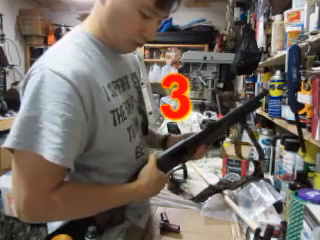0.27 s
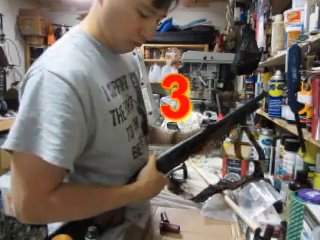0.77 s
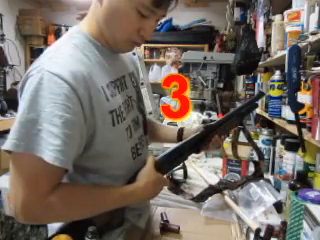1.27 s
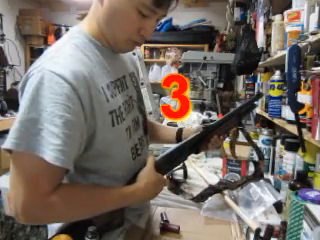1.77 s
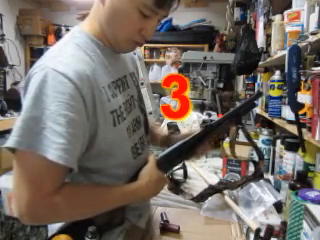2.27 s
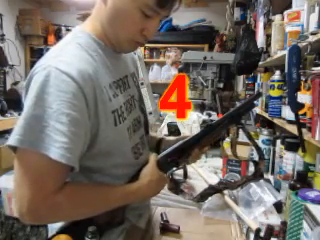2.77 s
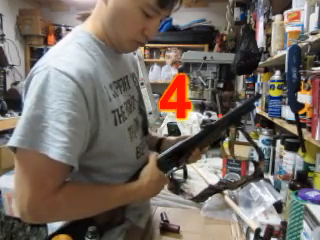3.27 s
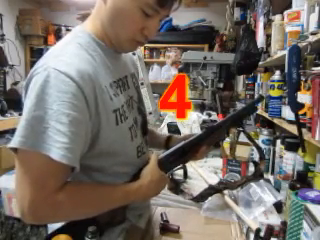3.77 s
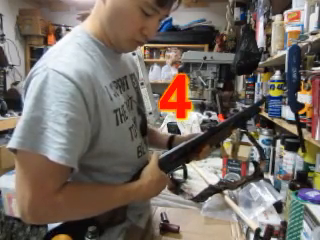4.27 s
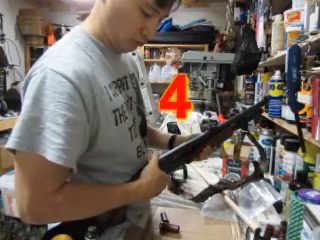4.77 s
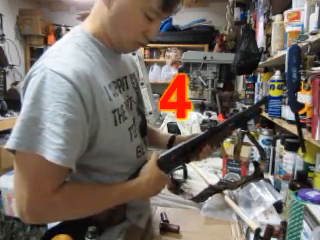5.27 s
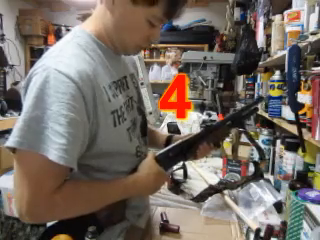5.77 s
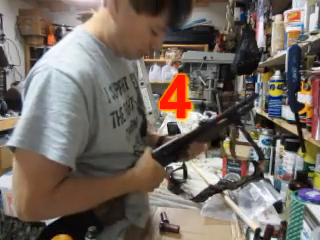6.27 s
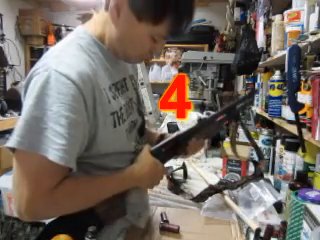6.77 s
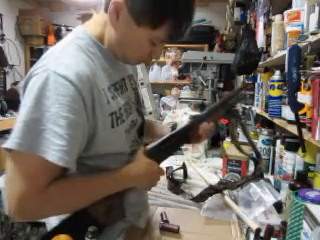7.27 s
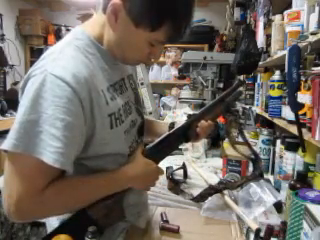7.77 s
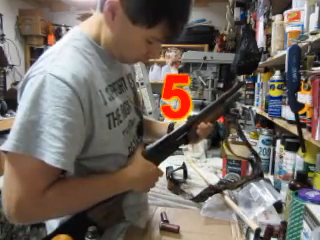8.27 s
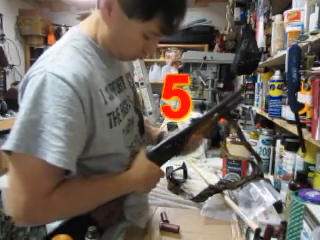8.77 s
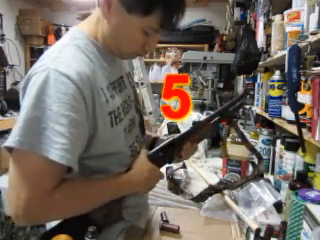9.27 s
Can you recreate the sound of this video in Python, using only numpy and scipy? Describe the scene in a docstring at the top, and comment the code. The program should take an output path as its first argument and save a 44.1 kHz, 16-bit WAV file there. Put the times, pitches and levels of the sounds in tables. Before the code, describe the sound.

Shells clack against a steel loading gate, scrape into the tube and seat with a low rumbling thump. The gate spring rings briefly after several clicks. Palms bump the stock and loose parts rattle lightly in the gaps. The gun is very near the microphone, slightly right, with a long, diffuse, dull room tail and little high treble.

```python
"""Loading a shotgun in a workshop

Shells are thumbed one by one into the magazine tube, in a cluttered workshop with a long dark reverberation.
Each clacks against the gate (filtered impulses and noise), scrapes in (trains of tiny clacks) and seats with
a thud (damped low modes) and a deep rumble (swelling noise). Hands bump the stock, loose parts rattle, the
gate spring sings, shells tap together and one creaks. Everything sounds deep and dull."""
import sys
import numpy as np
from scipy import signal
from scipy.fft import rfft, irfft, next_fast_len
from scipy.io import wavfile
from scipy.ndimage import uniform_filter1d, minimum_filter1d

SR = 44100
rng = np.random.default_rng(int(sys.argv[2]) if len(sys.argv) > 2 else 0)


def unload_wav(signal):
    """Save mono or channel-first audio to the path in sys.argv[1] as 16-bit WAV at rate SR, clipped to [-1, 1]."""
    wavfile.write(
        sys.argv[1],
        SR,
        np.round(np.clip(np.atleast_2d(signal).T, -1, 1) * 32767).astype(np.int16),
    )


N = 419832

TOP_HZ = 10800  # upper band limit
LEAD_IN = .012  # graze ahead of a blow (s)

# A hand or the gun's own weight bumps the stock. Each row: start in seconds, level in dB,
# then relative to it in dB: knock, rattle of loose parts, rocking of the gun.
STOCK_BUMPS = [(0.004, -27.5, -4.5, -17.5, 13.5), (0.653, -10.5, -6, -30.5, 3),
               (0.697, -19.5, -17, -27.5, -1), (0.81, -34, -2.5, -21, -1.5), (0.918, -16, -5.5, -16, 5),
               (1.1, -17.5, -12, -5.5, 0), (1.605, -22, -10, -2, 1), (1.724, -30.5, 3.5, -4, 4.5),
               (1.805, -38, -2, 8, 12), (2.302, -38, -1.5, -15, 15.5), (2.88, -39.5, -10.5, -15, 20.5),
               (3.373, -23, 8.5, 4.5, 12), (3.398, -19.5, 11.5, -6.5, 11.5), (3.83, -39, -7.5, -15, 17),
               (4.276, -15, -9, -14, 6.5), (4.319, -26, 0, -3, 15.5), (4.414, -19.5, -9.5, -20, 2),
               (4.548, -18, -12, -22, -1), (4.717, -33, -16, -14, 19.5), (4.788, -11.5, -11, -30.5, 0),
               (5.026, -14.5, -13.5, -35, 3), (5.156, -19, -21, -44, 3.5), (5.23, -33.5, -17, -24, 7),
               (5.321, -31, -15.5, -21.5, 8), (5.447, -39, -19.5, -12, 16.5),
               (5.822, -27.5, 5.5, -1.5, 9.5), (5.845, -25.5, -1.5, -14, 3), (5.984, -35, -14, -13.5, 8),
               (6.055, -31.5, -0.5, -19, 7.5), (6.487, -26, -5, -9, -12.5), (6.568, -27.5, 6, -0.5, -14),
               (7.323, -22, 1, -3.5, -7.5), (8.79, -33.5, -7, -13.5, 10), (9.157, -29.5, 1, -15.5, 14)]
# A shell goes home, shoving the gun against the body. Each row: time in seconds, rumble level in dB,
# level of the seating thud in dB.
SEATINGS = [(1.134, -22.5, -30.5), (2.78, -27, -31.5), (7.458, -27.5, -29.5), (9.249, -38.5, -35.5)]


def amp(db):
    """Decibels to amplitude."""
    return 10 ** (np.asarray(db) / 20)


def unit(x):
    """Scale to rms 1."""
    return x / np.sqrt(np.mean(x ** 2) + 1e-20)


def attack_unit(x, seconds):
    """Scale a blow to rms 1 over its first moments."""
    return x / np.sqrt(np.mean(x[..., :int(seconds * SR)] ** 2) + 1e-20)


def along(points, hz):
    """Read a curve of (Hz, value) points on a log frequency axis."""
    f, v = np.transpose(points)
    return np.interp(np.log(hz + 1), np.log(f), v)


def add(track, s, sound):
    """Mix a sound in from time s."""
    start = int(np.clip(round(s * SR), 0, N - 1))
    track[:, start:start + sound.shape[-1]] += sound[..., :N - start]


def pair(x, left_db):
    """Make the left channel louder than the right by left_db."""
    return x * amp([[left_db / 2], [-left_db / 2]])


def coloured(x, gain_db):
    """Causal minimum-phase filter whose gain in dB is a function of frequency."""
    n = x.shape[-1]
    m = 2 * next_fast_len(n // 2 + SR // 10)
    cepstrum = irfft(gain_db(np.fft.rfftfreq(m, 1 / SR)) * np.log(10) / 20)
    # folding the cepstrum forward makes the filter causal
    cepstrum[1:m // 2] *= 2
    cepstrum[m // 2 + 1:] = 0
    return irfft(rfft(x, m) * np.exp(rfft(cepstrum)), m)[..., :n]


def ring(modes, t, vary_db, detune, together=False):
    """Damped modes, varied at each blow by grip and point of contact; a square blow starts them together."""
    hz, db, t60 = np.transpose(modes)[:, :, None]
    size, shift = rng.standard_normal((2, len(modes), 1))
    sign = np.where(together, 1, rng.choice([-1, 1], (len(modes), 1)))
    decay = amp(db + vary_db * size - 60 * t / t60)
    tone = np.sin(2 * np.pi * hz * (1 + detune * shift) * t)
    return np.sum(sign * decay * tone, 0)


def air(level_db=-66):
    """Faint low room tone: filtered noise, partly shared by the two channels."""
    # Spectrum of the room tone. Each row: frequency in Hz, density in dB per Hz.
    tone_colour = [(25, 0), (70, 2), (160, -13.5), (300, -13), (1500, -26.5), (3000, -41), (5000, -59)]
    noise = rng.standard_normal((3, N))
    return amp(level_db) * unit(coloured(noise[:2] + noise[2], lambda hz: along(tone_colour, hz)))


def room_tail(build=0.013, linger=2.93):
    """A diffuse stereo tail builds up, then the treble dies first while a faint late part lingers."""
    # Decay of the workshop. Each row: frequency in Hz, t60 in seconds.
    decay_times = [(60, 1.5), (200, 1.11), (500, 1.013), (1400, 0.93), (2000, 0.92), (3000, 0.7),
                   (4200, 0.66), (8000, .33)]
    # Level of the lingering late part. Each row: frequency in Hz, level in dB.
    late_level = [(2500, -15.5), (3400, -17.5), (4300, -42)]
    # Likeness of left and right. Each row: frequency in Hz, correlation from 0 to 1.
    likeness = [(60, 1), (150, 0.53), (350, 0.64), (700, 0.29), (4000, 0.045)]
    hz, t, z = signal.stft(rng.standard_normal((2, 3 * SR // 2)), SR, nperseg=512)
    fall_db = -60 * t / along(decay_times, hz)[:, None]
    late_db = along(late_level, hz)[:, None] + fall_db / linger
    z = z * np.hypot(amp(fall_db), amp(late_db)) * (1 - np.exp(-t / build))
    # sharing the power between mid and side sets the likeness
    turn = np.arccos(np.clip(along(likeness, hz), -1, 1))[:, None] / 2
    mid, side = signal.istft(z * np.array([np.cos(turn), np.sin(turn)]), SR, nperseg=512)[1]
    return np.array([mid + side, mid - side]) / np.sqrt(SR / 10)


def room(x):
    """Overlapping pieces each get a fresh tail: the reflections change as the gun and the body move."""
    out, mono, hop = np.zeros((2, N)), x.mean(0), SR // 3
    for start in range(-hop, N, hop):
        index = np.arange(max(start, 0), min(start + 2 * hop, N))
        piece = mono[index] * np.sin(np.pi * (index - start) / (2 * hop))
        add(out, index[0] / SR, signal.fftconvolve(piece[None], room_tail(), axes=1))
    return out


def shove(swell=0.024, strain_db=-18, strain=0.2, sway_db=5):
    """A deep noise rumble strains up, peaks as each shell goes home and eases off again."""
    # Spectrum of the rumble. Each row: frequency in Hz, density in dB per Hz.
    rumble_colour = [(15, -23), (28, -8.5), (44, -5), (62, -10), (100, -16.5), (190, -9.5), (400, -52),
                     (1200, -100)]
    # Spectrum of the deepest part, opposite in the two channels. Each row: frequency in Hz, dB per Hz.
    sway_colour = [(15, -18), (30, -3), (65, 0), (110, -8), (200, -24), (500, -70)]
    t = np.arange(N) / SR
    push = np.zeros(N)
    for s, db, _ in SEATINGS:
        away = np.abs(t - s)
        push += amp(db) * (np.exp(-away / swell) + amp(strain_db) * np.exp(-away / strain))
    rumble = unit(coloured(rng.standard_normal((2, N)), lambda hz: along(rumble_colour, hz)))
    sway = amp(sway_db) * unit(coloured(rng.standard_normal(N), lambda hz: along(sway_colour, hz)))
    return pair(push * (rumble + np.array([sway, -sway])), left_db=-3.5)


def thud(modes, t, detune, vary_db=2, together=False):
    """Wood and mass answer a blow as damped modes, heard nearly alike in both channels."""
    body_s, width = .06, .18  # stretch that sets the level (s), left-right difference (share)
    mid = attack_unit(ring(modes, t, vary_db, detune, together), body_s)
    side = width * attack_unit(ring(modes, t, vary_db=3.5, detune=0.12), body_s)
    return np.array([mid + side, mid - side])


def bumps(stock_db=-12, boom_db=-25, knock_db=-17, slap_db=-14, slap_t60=0.09, soft=0.0083,
          knock_rise=.001, slap_rise=0.0013):
    """Palm, fingers and seating shells thump the stock, knock the fore-end and rock the gun."""
    # Modes of the stock. Each row: frequency in Hz, level in dB, t60 in seconds.
    stock_modes = [(98, -14, 0.57), (140.4, -2, 0.35), (188.5, -14, 0.54), (226.3, -9, 0.2)]
    # Modes of the fore-end. Each row: frequency in Hz, level in dB, t60 in seconds.
    fore_end_modes = [(214, 2, .09), (320, 3, 0.11), (423, -1.5, 0.096), (460, 3.5, 0.054),
                      (620, -5.5, .039)]
    # The whole gun rocking. Each row: frequency in Hz, level in dB, t60 in seconds.
    rocking_modes = [(28.2, -2.5, 0.022), (42.7, -7.5, 0.48), (67, -9, 0.49)]
    # Spectrum of a soft slap of skin. Each row: frequency in Hz, density in dB per Hz.
    skin_colour = [(30, -4), (120, -3), (350, 0), (700, -8), (1200, -26), (3000, -34), (4200, -45),
                   (5200, -81.5)]
    # Phase by which thumps lag in the left channel. Each row: frequency in Hz, lag in radians.
    left_lag = [(50, 0), (120, .6), (600, .7)]
    seat_knock_db, seat_rock_db = 6.5, 9.5  # knock and rocking of a seating shell, over its thud
    sag, sag_s = 0.29, .035  # excess pitch at the start (share), settling time (s)

    out, t = np.zeros((2, N)), np.arange(SR // 2) / SR
    # the stock's note starts sharp under the palm and sinks
    sagging = t + sag * sag_s * (1 - np.exp(-t / sag_s))
    seats = [(s, db, seat_knock_db, None, seat_rock_db) for s, _, db in SEATINGS]
    for s, db, knock, _, rock_db in STOCK_BUMPS + seats:
        stock = amp(stock_db) * thud(stock_modes, sagging, detune=.02)
        fore_end = amp(knock + knock_db) * thud(fore_end_modes, t, detune=.06, together=True)
        fore_end = fore_end * (1 - np.exp(-t / knock_rise))
        rock = amp(boom_db + rock_db) * thud(rocking_modes, t, detune=.04)
        flesh = rng.standard_normal(len(t)) * amp(-60 * t / slap_t60) * (1 - np.exp(-t / slap_rise))
        slap = attack_unit(coloured(flesh, lambda hz: along(skin_colour, hz)), 0.012)
        cushioned = (stock + rock) * (1 - np.exp(-t / soft))
        add(out, s, amp(db) * (cushioned + fore_end + amp(knock + slap_db) * slap))
    # the thump is louder on the right and reaches the left a little later
    m = next_fast_len(N + SR // 2)
    lag = along(left_lag, np.fft.rfftfreq(m, 1 / SR))
    late = irfft(rfft(out[0], m) * np.exp(-1j * lag), m)[:N]
    return pair(np.array([late, out[1]]), left_db=-3.5)


def squeak(waver=0.039):
    """A shell creaks on the steel: nearly regular stick and slip gives a faint, unsteady harmonic note."""
    # Course of the creak. Each row: time in seconds, pitch in Hz, level in dB.
    creak_course = [(8.5, 730, -70), (8.512, 724, -60), (8.54, 716, -58.5), (8.552, 699, -49),
                    (8.567, 720, -62.5)]
    # Level of each harmonic in dB, from the fundamental up.
    harmonics_db = [-23.5, 4, -16, -23.5, -21, -29]
    out, (s, hz, db) = np.zeros((2, N)), np.transpose(creak_course)
    t = np.arange(s[0], s[-1], 1 / SR)
    wander = unit(uniform_filter1d(rng.standard_normal(len(t)), size=90))
    pitch = np.interp(t, s, hz) * (1 + waver * wander)
    phase = 2 * np.pi * np.cumsum(pitch) / SR
    note = sum(amp(level) * np.sin(k * phase) for k, level in enumerate(harmonics_db, 1))
    add(out, s[0], amp(np.interp(t, s, db)) * note)
    return out


def taps():
    """Loose shells tap together in the hand, each leaving a short hollow note of damped modes."""
    # Each row: start in seconds, pitch in Hz, level in dB.
    tap_list = [(1.601, 1046, -38.5), (1.726, 1060, -34.5), (3.166, 1020, -35.5), (3.269, 1096, -45),
                (4.443, 1056, -36.5), (4.471, 1070, -44), (4.552, 1094, -43), (4.571, 1130, -39.5)]
    # Modes of a hull. Each row: ratio to the pitch, level in dB, t60 in seconds.
    hull_modes = [(.88, -5, .025), (1, 0, .06), (1.179, -3, .045), (1.48, -11, .03)]
    out, t = np.zeros((2, N)), np.arange(SR // 5) / SR
    for s, hz, db in tap_list:
        modes = [(hz * ratio, level, t60) for ratio, level, t60 in hull_modes]
        add(out, s, amp(db) * ring(modes, t, vary_db=0.0, detune=0.0046) * (1 - np.exp(-t / .002)))
    return pair(out, left_db=-9.5)


def spring():
    """The gate's spring rings on after a flick; each flick favours its lower or upper modes."""
    # Each row: start in seconds, level in dB, lift of the modes above 3500 Hz in dB.
    flicks = [(1.081, -48.5, 14.5), (1.102, -33.5, 1.5), (2.244, -43, 2.5), (2.294, -30, -5),
              (2.473, -40.5, 0), (6.168, -73.5, -6), (7.445, -37.5, 3), (7.476, -38, 11.5), (8.738, -34, 1),
              (8.786, -33.5, -2.5)]
    # Modes of the spring. Each row: frequency in Hz, level in dB, t60 in seconds.
    spring_modes = [(2622, -5, .17), (2930, -9, .25), (3074, 0, .18), (3615, -21, .4), (3946, -22, .24),
                    (4135, -16.5, .22), (4834, -34, .16), (8370, -40, .3), (8936, -46, .2)]
    out, t = np.zeros((2, N)), np.arange(SR // 2) / SR
    for s, db, upper_db in flicks:
        modes = [(hz, level + upper_db * (hz > 3500), t60) for hz, level, t60 in spring_modes]
        add(out, s, amp(db) * ring(modes, t, vary_db=2.0, detune=0.00056) * (1 - np.exp(-t / 0.0013)))
    return out


def clack(body_db, hollow_db, edge_db, chatter_t60, snap=3, graze_db=-17, clutter_db=-7, vary_db=2):
    """A graze, a snap, a chatter of loose parts and scatter off nearby shelves, all ringing the receiver."""
    # Spectrum of steel and shell contacts. Each row: frequency in Hz, density in dB per Hz.
    contact_colour = [(30, -25), (150, -5.5), (450, -0.5), (950, -4), (1500, -1), (2000, -5), (2800, -15),
                      (3700, -25), (4400, -37.5), (5050, -62), (5800, -56), (7000, -68.5), (8200, -52),
                      (10000, -56.5), (11000, -67.5)]
    # Resonances of receiver and tube. Each row: frequency in Hz, width in Hz, lift in dB.
    resonances = [(448, 71, 3), (630, 230, 1.5), (860, 140, 3), (1093, 60, 2), (1250, 170, 3.5),
                  (1660, 63, 1.5), (1750, 70, 0.5), (3620, 40, 6.5)]
    bite, release, release_s = 0.002014, .6, .0001  # onset (s), spring-back (share of snap), its delay (s)
    graze_s, clutter_t60 = .003, 0.28  # swell of the graze into the blow, decay of the scatter (s)

    t = np.arange(SR // 5) / SR - LEAD_IN
    after = np.maximum(t, 0)
    touches = unit(rng.standard_normal(len(t)) * (rng.random(len(t)) < 3000 / SR))  # about 3000 a second
    grazing = amp(graze_db) * np.exp(-np.abs(t) / graze_s)
    chatter = amp(-60 * after / chatter_t60) * (1 - np.exp(-after / bite))
    force = touches * (grazing + chatter)
    # the steel springs back right after the snap
    force[int((LEAD_IN + bite) * SR)] += snap
    force[int((LEAD_IN + bite + release_s) * SR)] -= release * snap
    scatter_level = amp(clutter_db - 60 * after / clutter_t60) * (1 - np.exp(-after / 0.0014))
    scatter = scatter_level * rng.standard_normal((3, len(t)))
    heard = force + 0.73 * scatter[:2] + 0.37 * scatter[2]  # the third noise is common to both channels

    hardness = [(350, body_db), (700, hollow_db), (1100, 0.0), (1900, 0.0014), (2900, edge_db)]  # (Hz, dB)
    # each point of contact favours its own resonances
    centres = np.geomspace(300, TOP_HZ, 70)
    spot = np.column_stack([centres, vary_db * rng.standard_normal(len(centres))])

    def colour(hz):
        steel = sum(lift_db / (1 + (2 * (hz - centre) / width) ** 2) for centre, width, lift_db in resonances)
        return along(contact_colour, hz) + along(hardness, hz) + along(spot, hz) + steel

    return attack_unit(coloured(heard, colour), 2 * LEAD_IN)


def rattles(level_db=-15):
    """A knock on the stock gives the loose parts of the action a short, crisp shake."""
    out = np.zeros((2, N))
    for s, db, _, rattle_db, _ in STOCK_BUMPS:
        tick = clack(body_db=12.5, hollow_db=10.5, edge_db=-9.5, chatter_t60=0.042,
                     clutter_db=-11.5, graze_db=-32.5)
        add(out, s - LEAD_IN, amp(db + rattle_db + level_db) * tick)
    return out


def slides(catches_hz=170, uneven=.45, catch_spread_db=4, rub=0.04, swell=0.0042, count=3):
    """The hull catches and slips along the steel, touching at a few points with a colour each."""
    # A shell rubs along the steel. Each row: start and end in seconds, first and last level in dB.
    rubs = [(0.005, 0.117, -47, -52), (0.276, 0.42, -56, -46), (0.489, 0.502, -33, -25.5),
            (0.519, 0.596, -37.5, -47), (0.842, 0.94, -43, -29), (0.94, 1.019, -27, -24),
            (1.045, 1.165, -30.5, -25), (2.181, 2.246, -57, -40.5), (2.598, 2.622, -27.5, -18.5),
            (2.622, 2.807, -29.5, -32.5), (3.145, 3.32, -58.5, -58), (3.75, 3.962, -32.5, -48.5),
            (3.819, 3.836, -32.5, -23.5), (4.066, 4.082, -43, -48), (4.39, 4.613, -61.5, -61),
            (6.346, 6.507, -41.5, -39), (6.559, 6.575, -31.5, -22.5), (6.99, 7.141, -51.5, -27),
            (7.217, 7.231, -33.5, -21.5), (7.271, 7.341, -32, -26), (7.371, 7.412, -28.5, -22.5),
            (7.429, 7.519, -22, -18.5), (9.08, 9.097, -31, -25), (9.122, 9.3, -29.5, -36.5),
            (9.234, 9.245, -30, -12.5)]
    out = np.zeros((2, N))
    for start, end, first_db, last_db in rubs:
        n = max(int((end - start) * SR), SR // 125)
        pressure = amp(np.linspace(first_db, last_db, n)) * (1 - np.exp(-np.arange(n) / (swell * SR)))
        gap, size, point = rng.standard_normal((3, 128))
        at = (np.cumsum(np.exp(uneven * gap)) * SR / catches_hz).astype(int)
        inside = at < n
        # steady rubbing, plus catches dealt out at random to the points
        slips = rub * rng.uniform(-1, 1, (count, n))
        slips[np.argsort(point)[inside] % count, at[inside]] += amp(catch_spread_db * size[inside])
        # every slip is a tiny clack
        ticks = np.array([clack(body_db=-1.5, hollow_db=7.0, edge_db=-9.0, chatter_t60=0.012,
                                clutter_db=-16.5, vary_db=4.5) for _ in range(count)])
        scrape = signal.fftconvolve((slips * pressure)[:, None], ticks, axes=2).sum(0)
        # the scrape carries the energy of the pressure curve
        add(out, start - LEAD_IN, scrape * np.sqrt(2 * np.sum(pressure ** 2) / np.sum(scrape ** 2)))
    return out


def clacks(level_db=-14.5, usual_body_db=-17, usual_edge_db=-22, usual_hollow_db=1, chatter_t60=0.049,
           lead=.001):
    """Shells strike, ring the part they hit and bounce once; lighter blows sound hollower."""
    # A shell strikes the gate, the tube mouth or the catch. Each row: time in seconds, level in dB,
    # body in the lows in dB, edge in the treble in dB, rebound relative to the blow in dB,
    # pitch of the struck part in Hz, relative level of its ring in dB.
    strikes = [(0.05, -27.5, -7, -21.5, -17.5, 1950, -12.5), (0.423, -17.5, -21.5, -27, -8.5, 1790, -12.5),
               (0.44, -15.5, -18, -22.5, -15, 1700, -19), (0.503, -7.5, -27, -24.5, -26, 1182, -9.5),
               (0.529, -14.5, -3.5, -28.5, -5.5, 1220, -10), (0.551, -16, -18.5, -20, -8, 807, -7),
               (0.579, -17.5, -22.5, -22, -6.5, 873, -9), (0.928, -12, -22, -16.5, -8.5, 1420, -17),
               (0.999, -11, -28.5, -24.5, -16, 1650, -13.5), (1.016, -10.5, -26, -29.5, -12.5, 1560, -14.5),
               (1.056, -14.5, -20.5, -19.5, 0, 1510, -10.5), (1.081, -8, -24.5, -20, -6, 2850, -23.5),
               (1.101, -7, -20.5, -19, -13.5, 2930, -17.5), (1.118, -5.5, -23, -18, -3, 1650, -18.5),
               (1.143, -12.5, -26, -21, -3, 1780, -7), (1.728, -31, -9, -31, -0.5, 1054, -5),
               (2.253, -12, -31, -24.5, -16.5, 1413, -8.5), (2.298, -4.5, -25, -23.5, -4.5, 1280, -4.5),
               (2.309, -14.5, -15.5, -30, -8, 531, 0), (2.397, -20, -20.5, -23, -8, 1900, -14),
               (2.474, -10, -23.5, -25, -16.5, 1330, -11.5), (2.495, -11.5, -27, -25, -13, 1295, -6.5),
               (2.616, -9, -24, -28, -9, 1880, -12.5), (2.641, -7, -26, -21, -23, 1870, -5.5),
               (2.681, -4, -20, -19, -10.5, 1530, -12.5), (2.704, -6.5, -34, -27, -12, 1550, -17),
               (2.721, -14.5, -25, -17.5, -17, 1540, -14), (2.763, -7.5, -28, -17, -14.5, 2214, -4),
               (2.777, -6.5, -25, -17.5, -11.5, 2000, -19.5), (2.803, -8.5, -16.5, -17.5, -5, 2000, -17.5),
               (2.943, -21.5, -31, -20.5, -12, 2270, -6), (3.165, -31.5, -21.5, -24.5, -13.5, 1120, -10),
               (3.191, -28, -3, -25, -6.5, 1080, -12), (3.235, -26.5, -16, -27.5, -14.5, 1110, -8.5),
               (3.269, -25.5, -28, -20, -20.5, 1127, -5), (3.293, -34.5, -22.5, -19, -17.5, 1490, -18),
               (3.374, -19, -6, -19.5, -23.5, 849, -7.5), (3.714, -22.5, -14.5, -31.5, -3.5, 1580, -9.5),
               (3.756, -20, -18, -18.5, -17.5, 2330, -10.5), (3.777, -23, -18, -15.5, -12.5, 2380, -1.5),
               (3.828, -9, -24.5, -24.5, -18, 1334, -14.5), (3.858, -17, -24, -22, -7, 2260, -14),
               (3.871, -15.5, -14, -23.5, -23.5, 585, -7.5), (3.891, -15.5, -13.5, -21, -20, 2230, -12.5),
               (3.916, -16, -18.5, -20, -6, 1770, -11.5), (4.312, -22, -3, -26, -17.5, 1283, -23),
               (4.447, -31, -3, -25.5, -27, 1100, -16), (4.553, -32.5, -8.5, -24.5, -23, 1074, -10),
               (4.573, -25.5, -3.5, -29, -22, 1250, -6.5), (4.661, -45, -15.5, -16.5, -15, 1500, -22),
               (4.713, -37, -15.5, -28, -15, 1390, -11), (5.822, -20, -12.5, -39, -22.5, 1397, -10),
               (5.85, -39.5, -15, -44, -12.5, 1500, -11.5), (5.986, -32.5, -11, -33, -7, 1630, -12),
               (6.118, -37.5, -6.5, -30, -14.5, 1560, -15), (6.168, -33.5, -7, -34.5, -5.5, 760, -3.5),
               (6.231, -15, -15, -29.5, -10.5, 881, -3), (6.386, -16.5, -17.5, -19, -11, 2305, -8),
               (6.412, -20.5, -15, -33, -17.5, 1650, -13.5), (6.442, -12, -19, -24, -6.5, 1625, -11.5),
               (6.485, -17.5, -4, -15, -19, 1690, -10.5), (6.572, -9, -20.5, -24, -2.5, 1730, -14),
               (6.601, -12, -12.5, -21, -16.5, 1213, -7), (6.77, -23, -23, -29.5, -9, 1760, -14),
               (6.927, -29, -0.5, -52, -19.5, 1384, -8), (7.102, -21.5, -21, -23.5, -4.5, 1480, -17),
               (7.142, -7, -24.5, -21.5, -16, 1480, -15), (7.163, -7.5, -20, -26.5, -3.5, 1290, -11),
               (7.237, -4.5, -23, -24, -6, 1754, -9), (7.287, -14, -30.5, -38, 3.5, 1830, -9.5),
               (7.311, -12.5, -22.5, -27, -3, 1820, -6), (7.324, -5.5, -22, -22, -15.5, 1520, -8.5),
               (7.335, -16, -17.5, -24, -24, 2290, -26), (7.354, -6.5, -34.5, -19.5, -17, 2280, -9.5),
               (7.407, -13, -24, -24.5, -16.5, 1450, -4.5), (7.427, -5.5, -23.5, -24, -7.5, 2950, -22.5),
               (7.444, -6.5, -19, -12, -4.5, 2840, -21.5), (7.479, -3.5, -17, -22, -14.5, 1290, -26),
               (7.494, -9.5, -17, -17, -8.5, 1240, -12), (8.722, -27, -17.5, -22, -9, 1810, -14),
               (8.737, -17, -29, -22.5, -22, 1990, -4), (8.743, -10.5, -34, -26.5, -9.5, 1450, -7.5),
               (8.784, -6, -23, -19, -6.5, 1194, 0), (8.797, -12, -16.5, -31, -11.5, 1075, 3.5),
               (8.88, -16, -22.5, -19.5, -16.5, 838, -9), (8.952, -11, -24.5, -24, -11.5, 651, -5.5),
               (8.958, -9.5, -29.5, -23, -3.5, 658, -4), (9.092, -7.5, -20.5, -22.5, -18.5, 1840, -31),
               (9.116, -6.5, -20.5, -21.5, -17, 1860, -6), (9.156, -5, -15, -19.5, -8.5, 1236, -8),
               (9.172, -10, -22, -18.5, -7, 1670, -8), (9.199, -16, -24, -20.5, -8, 1430, -5),
               (9.243, -4, -19, -21.5, -16.5, 1324, -5.5), (9.281, -15, -24, -16.5, -15.5, 1397, 0),
               (9.407, -20.5, -8, -14.5, -6.5, 2013, -4), (9.509, -20.5, -30.5, -23.5, 4, 1754, -7)]
    firm_db = -11  # level of a firm blow in the table
    hollow_per_db, sharp_per_db = 0.4, -0.13  # per dB under firm (dB), per dB over firm (log of snap)
    rebound_s, rebound_spread = .013, .15  # delay of the bounce (s), its scatter (share)
    ring_boost_db, ring_t60 = 11, .07  # the struck part's note: lift (dB), decay (s)

    out, t = np.zeros((2, N)), np.arange(SR // 5) / SR
    scatter = rng.standard_normal(len(strikes))
    for (s, db, body_db, edge_db, rebound_db, hz, ring_db), luck in zip(strikes, scatter):
        body = min(body_db - usual_body_db, 10)
        hollow = usual_hollow_db + hollow_per_db * (firm_db - db)
        edge = edge_db - usual_edge_db
        # blows over firm have less snap against their chatter
        snap = 4.1 * np.exp(sharp_per_db * min(max(db - firm_db, 0), 6))
        bounce_s = rebound_s * (1 + rebound_spread * luck)
        for delay, change_db in (0, 0), (bounce_s, rebound_db):
            blow = clack(body, hollow, edge, chatter_t60, snap)
            add(out, s + delay - LEAD_IN - lead, amp(db + change_db + level_db) * blow)
        note = np.sin(2 * np.pi * hz * t) * amp(-60 * t / ring_t60) * (1 - np.exp(-t / 0.0008)) ** 2
        add(out, s, amp(db + level_db + ring_db + ring_boost_db) * note)
    return out


def leaning(x):
    """The gun is off to the right: the left channel gets less of its low notes and more of its top."""
    # Balance of the steel's direct sound. Each row: frequency in Hz, left minus right in dB.
    balance = [(250, -1.5), (600, -3), (1200, -2.5), (2200, 0), (8000, 2)]
    left = coloured(x[0], lambda hz: along(balance, hz) / 2)
    right = coloured(x[1], lambda hz: -along(balance, hz) / 2)
    return np.array([left, right])


def scene(steel_wet_db=-6, thud_wet_db=-9.5):
    """The gun close by, the room behind it."""
    steel = leaning(clacks() + rattles() + slides() + spring() + taps() + squeak())
    thuds = bumps()
    reverberation = room(amp(steel_wet_db) * steel + amp(thud_wet_db) * thuds)
    return steel + thuds + shove() + reverberation + air()


def record(dry):
    """A limiter holds down the highest peaks, then everything above the band limit is cut."""
    ceiling, hold_s = .7, .006  # highest peak (share of full scale) ahead of the cut, hold (s)
    hold = int(hold_s * SR)
    needed = np.minimum(1, ceiling / (np.abs(dry).max(0) + 1e-9))
    held = minimum_filter1d(needed, 2 * hold)
    gain = uniform_filter1d(uniform_filter1d(held, hold), hold)
    m = next_fast_len(N + SR // 2)
    return irfft(rfft(dry * gain, m) * (np.fft.rfftfreq(m, 1 / SR) < TOP_HZ), m)[:, :N]


dry = scene()
out = record(dry)
unload_wav(out)
```